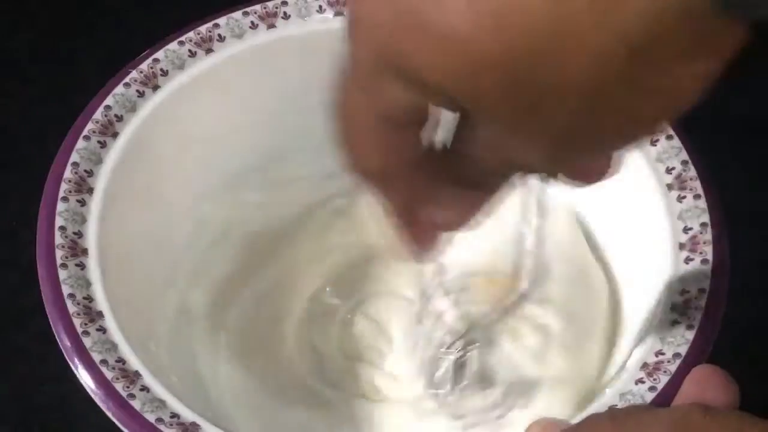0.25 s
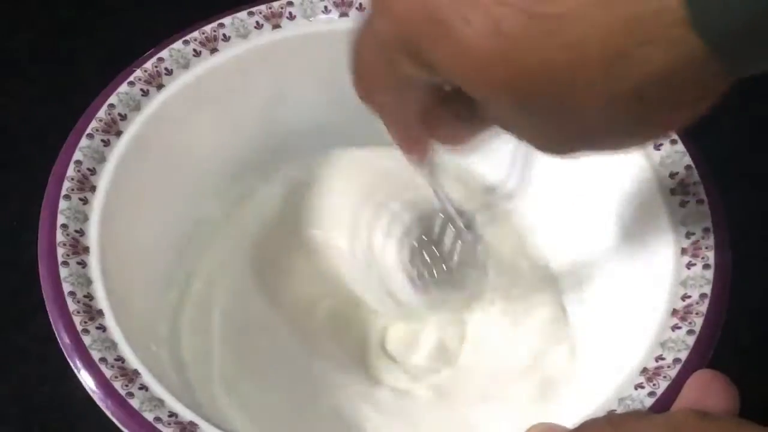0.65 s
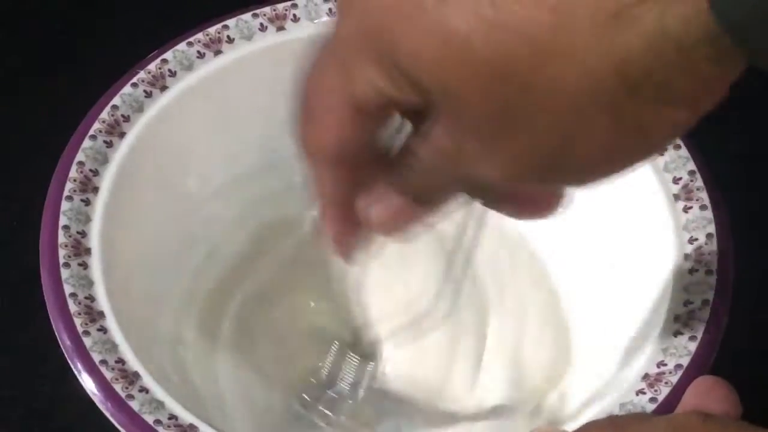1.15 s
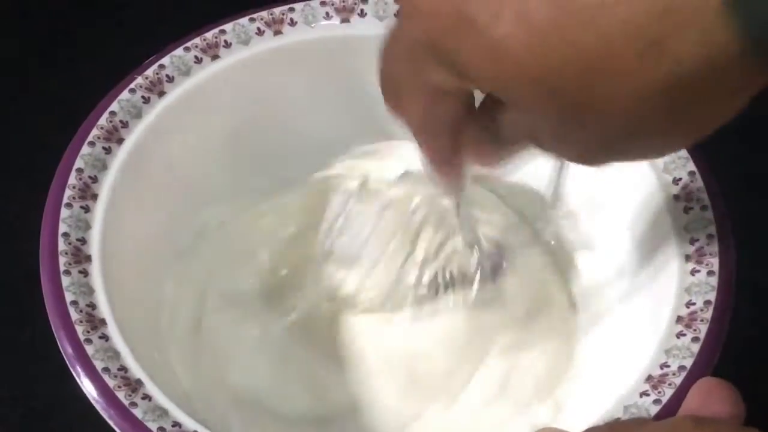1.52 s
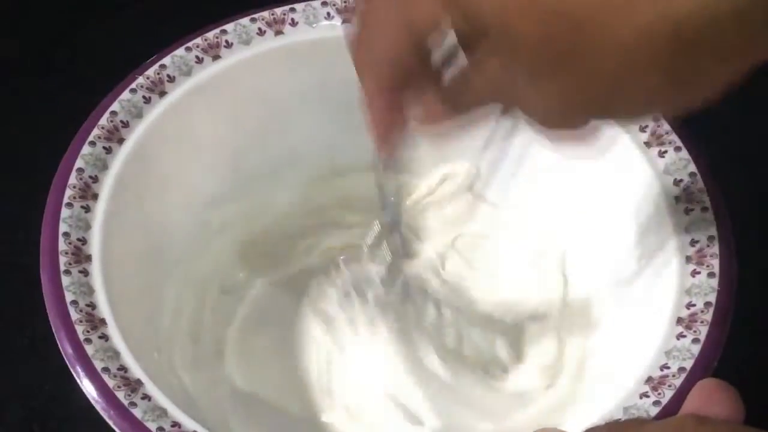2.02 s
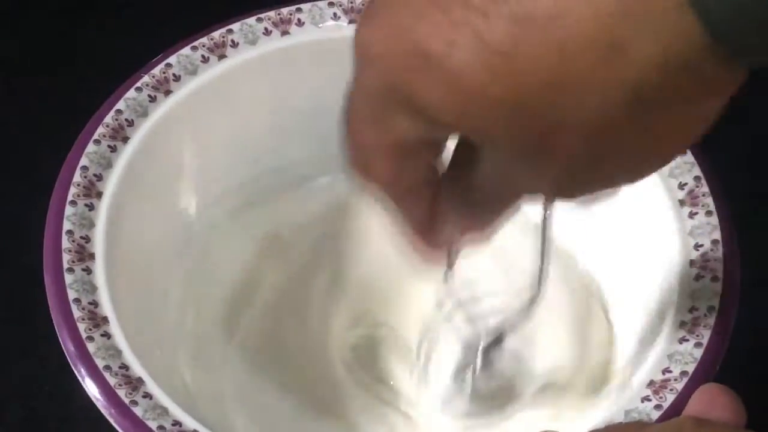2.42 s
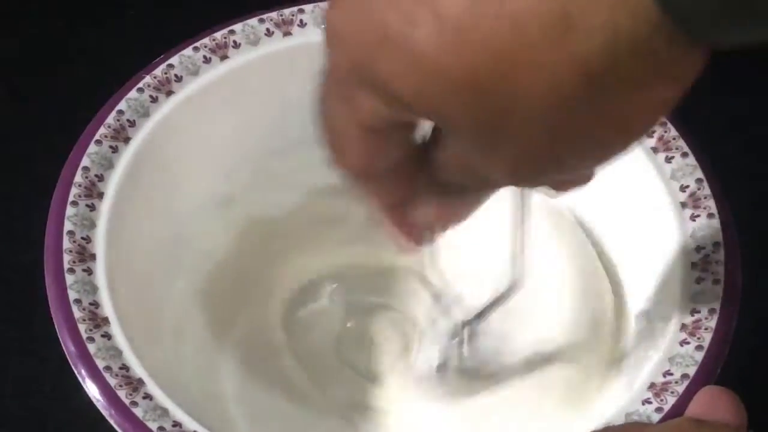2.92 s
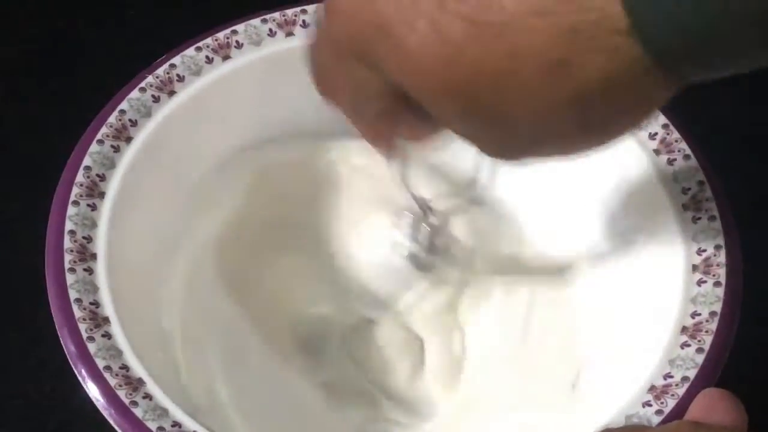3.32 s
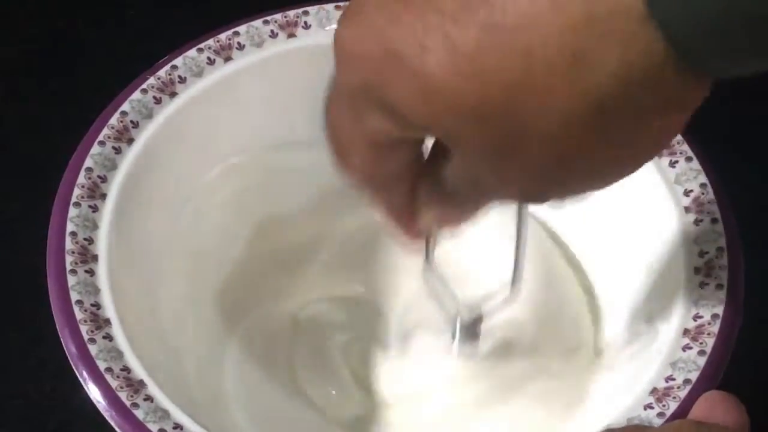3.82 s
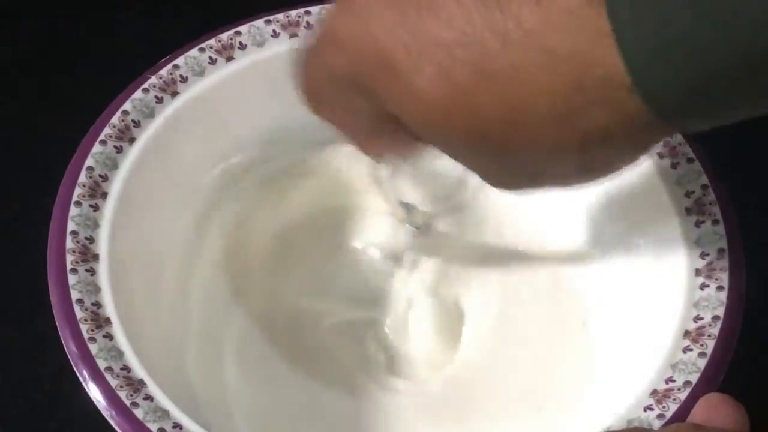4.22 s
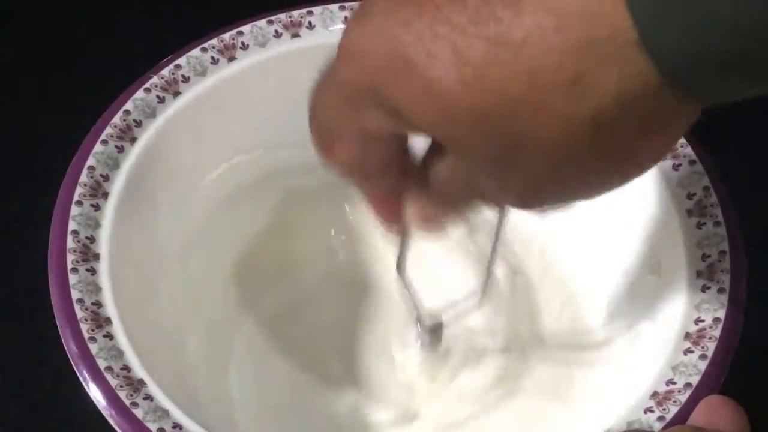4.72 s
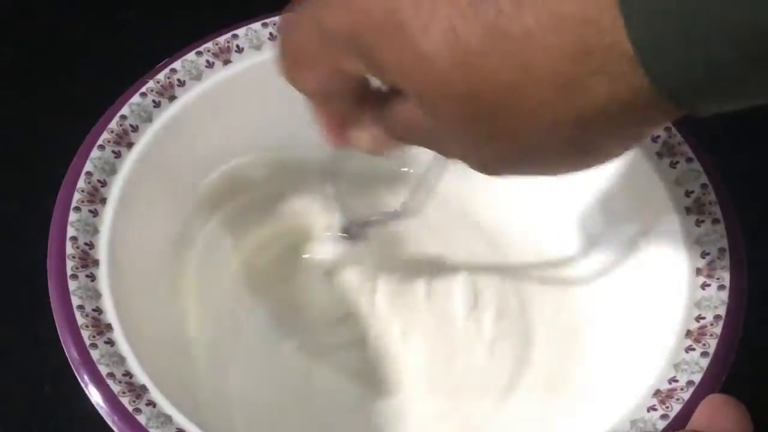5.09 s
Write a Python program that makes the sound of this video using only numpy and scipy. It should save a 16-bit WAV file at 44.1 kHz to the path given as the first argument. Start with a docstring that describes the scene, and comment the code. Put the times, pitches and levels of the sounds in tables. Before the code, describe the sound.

A wire whisk beats runny cream in a wide bowl, about four strokes a second. Each stroke is a wet, fizzy swish dotted with small squelches and sharp snaps of drops. About a second and a half in, the wires clatter against the bowl for three strokes with a brief ring, then the wet whisking carries on. The microphone is close, in a quiet room with a faint hum.

```python
"""A wire whisk beats runny cream in a wide bowl, about four strokes a second.
The place is a quiet room, with a phone microphone close to the bowl. Up front the wires tear the
cream into a fine crackle, air pockets squelch, and films and drops snap. For three strokes the wires
clatter against the bowl and ring. Behind it are faint wall reflections, a hum and a low rumble."""
import sys
import numpy as np
from scipy import signal
from scipy.fft import rfft, irfft, next_fast_len
from scipy.io import wavfile
from scipy.ndimage import map_coordinates

SR = 44100
rng = np.random.default_rng(int(sys.argv[2]) if len(sys.argv) > 2 else 0)


def generate_wav(signal):
    """Clip the signal to [-1, 1] and save it as 16-bit WAV at the path in sys.argv[1]."""
    frames = np.transpose(np.atleast_2d(signal))
    scaled = np.clip(frames, -1, 1) * 32767
    pcm = np.round(scaled).astype(np.int16)
    wavfile.write(sys.argv[1], SR, pcm)


N = 236050

# whisk strokes through the cream: t/s, length/s, relative fizz level/dB, body offset/dB
WHISK_STROKES = [(0.0, 0.17, -48, -6), (0.293, 0.2, -41.5, -10), (0.504, 0.093, -40.5, -5),
                 (0.634, 0.12, -44.5, -2.5), (0.774, 0.16, -44.5, -5.5), (1.044, 0.1, -37, -5.5),
                 (1.172, 0.16, -41.5, -8), (1.357, 0.071, -50, -13), (1.57, .11, -43, -1),
                 (1.761, .13, -41.5, -7), (1.977, 0.31, -43, -4), (2.262, 0.23, -45, -2),
                 (2.598, 0.25, -44.5, -5), (2.854, 0.27, -40.5, -11), (3.113, 0.19, -44, -1),
                 (3.331, .15, -42, 0), (3.522, 0.22, -44.5, 1), (3.747, 0.15, -45.5, -0.5),
                 (3.927, 0.088, -41.5, -3), (4.115, 0.24, -45.5, 0), (4.307, 0.069, -44, 2.5),
                 (4.465, .13, -46.5, 2.5), (4.732, 0.17, -47, 3), (4.963, 0.24, -46.5, -2.5),
                 (5.157, 0.18, -48, 4.5)]
# the loudest wet snaps of cream on the wires: t/s, relative crack level/dB, body offset/dB
CREAM_SNAPS = [(0.0093, -29.5, -8), (0.3209, -32, -10), (0.3706, -39, -14), (0.5016, -33, -16),
               (0.7326, -32.5, -19), (0.8306, -40.5, 9), (0.9571, -30.5, -10), (1.0345, -35.5, 1),
               (1.1367, -31, -12), (1.1864, -33, -5), (1.3126, -29, -22), (1.3664, -35, -16),
               (1.4431, -40, 8.5), (1.4685, -43.5, 2), (2.4598, -34.5, 0), (2.6999, -29, -8),
               (2.8069, -38, -13), (2.8803, -36.5, -7), (3.0338, -29.5, -22), (3.0698, -29, -14),
               (3.1655, -28.5, -3.5), (3.2551, -31, -6), (3.3852, -30, -16), (3.4798, -41, -11),
               (3.5441, -48, -8), (3.6192, -32, -13), (3.6944, -32.5, -4), (3.7542, -37, 10.5),
               (3.8551, -32.5, -9), (3.9327, -36, 0), (4.1166, -35.5, 6.5), (4.1297, -40, 0),
               (4.175, -33.5, 3), (4.3255, -32.5, -3), (4.3695, -40, -5), (4.4939, -31, 4.5),
               (4.7375, -43, 9.5), (4.9699, -30, -0.5), (5.0968, -47, 9), (5.1719, -28, -3)]
# air pockets behind the wires: t/s, length/s, starting f/Hz, relative levels of ring/dB and spray/dB
AIR_POCKETS = [(0.005, 0.014, 1607, -37.5, -48), (0.237, 0.052, 1860, -45.5, -45.5),
               (0.292, 0.039, 1078, -41, -40), (0.307, 0.04, 2230, -42, -47),
               (0.435, 0.034, 3450, -46.5, -43), (0.514, 0.038, 1110, -46.5, -55),
               (0.557, 0.018, 1150, -35, -38), (0.578, 0.02, 1266, -33.5, -49.5),
               (0.655, .035, 1210, -46, -36.5), (0.778, 0.09, 1244, -43, -49),
               (0.903, 0.03, 2643, -40.5, -36), (0.959, 0.023, 1174, -39, -44),
               (1.026, 0.05, 1353, -42, -46), (1.109, 0.013, 1870, -37.5, -56), (1.23, .03, 1370, -47, -52),
               (1.283, 0.058, 1943, -43, -41), (2.066, 0.032, 1373, -40.5, -44),
               (2.268, 0.03, 1726, -43, -39), (2.388, 0.026, 2580, -41, -43),
               (2.392, 0.0085, 3930, -29.5, -40), (2.636, 0.032, 3850, -41.5, -38.5),
               (2.698, 0.0095, 2510, -32, -46), (2.713, 0.023, 2170, -45, -41),
               (2.788, 0.045, 1290, -47, -55), (2.944, 0.052, 1183, -42.5, -52),
               (2.962, 0.021, 3480, -34, -48), (3.053, 0.033, 1346, -42, -49),
               (3.395, 0.029, 1402, -41.5, -59), (3.531, .025, 1643, -43, -56),
               (3.604, 0.031, 1310, -40.5, -40), (3.745, 0.019, 2586, -35.5, -59),
               (3.777, 0.024, 2110, -41, -59), (3.85, 0.03, 2720, -41.5, -35), (4.116, .02, 1132, -44, -40),
               (4.236, 0.043, 2980, -48, -44.5), (4.319, 0.014, 1043, -37.5, -34),
               (4.873, 0.0083, 3350, -41.5, -41.5), (5.22, .03, 1547, -45.5, -39),
               (5.309, 0.026, 3080, -44.5, -55)]
# wires striking the bowl: t/s, relative crack level/dB, body offset/dB
WIRE_KNOCKS = [(1.5178, -41.5, 5.5), (1.5699, -21.5, -0.5), (1.5789, -25.5, -20), (1.6281, -26, -11),
               (1.6585, -32, -2), (1.755, -34.5, 1), (1.7785, -23.5, 1.5), (1.8327, -38.5, 6),
               (1.848, -35.5, 4), (1.871, -30, -7), (1.9064, -37, 2.5), (1.9697, -32, -5),
               (1.9923, -20.5, -8), (2.0388, -45.5, 14), (2.0777, -35, -5), (2.101, -26.5, -5),
               (2.1985, -32, -6)]
# ringing modes of bowl and wires: f/Hz, relative level/dB, t60/s
RING_MODES = [(794, -5.5, 0.31), (1030, 7.5, 0.039), (1510, -3, 0.089), (2310, 0, 0.14), (2780, 3, 0.052),
              (4410, 0, 0.11), (6239, -2, 0.13), (6500, -6, 0.065), (6800, 13, 0.04), (7120, 4, 0.18),
              (8700, 4, 0.16), (11690, -1, 0.18), (13100, -7, .04), (13300, -1, .1), (15300, -2, .12)]
# air resonances of the open bowl: f/Hz, width/Hz, level over the direct sound/dB
BOWL_RESONANCES = [(718.6, 13, 8), (789, 32, -8), (927, 135, -7.5), (1249, 6.4, -4.5), (1571, 25, -7.5),
                   (2383, 38, -4), (2542, 90, -5), (2835, 150, -6.5), (3450, 71, -9), (4340, 117, -3),
                   (5270, 150, -13), (9850, 130, -16)]
# hum in the room: f/Hz, level before its balance shifts/dB, level after/dB
HUM_TONES = [(61, -87, -70), (101.6, -66.5, -71), (144.4, -73.5, -64.5), (291.5, -72, -71)]
# spectra: f/Hz, relative level/dB
FIZZ_SPECTRUM = [(300, -61), (700, -22), (1500, -4.5), (2800, -3), (4300, 1.5), (4900, -2), (5500, 3),
                 (7700, 0), (9600, 2.5), (10400, -2.5), (11700, 2.5), (15200, 1.5), (16000, -14)]  # bright top of the cream
BODY_SPECTRUM = [(150, -59), (500, -36.5), (630, -14), (820, 3), (1150, -0.5), (1450, -1), (2100, -1),
                 (3000, -3), (4200, -2.5), (8000, -4)]  # wet midrange of the cream
CRACK_SPECTRUM = [(250, -44), (1800, -21), (2700, -6), (5000, -6), (6500, 2), (7800, -6), (8700, -0.5),
                  (10300, -2.5), (13000, 5), (15800, -2)]  # sharp edge of a knock
THUD_SPECTRUM = [(150, -20), (480, -21.5), (620, -17), (780, 0), (1000, -7), (1500, -3), (2100, -4.5),
                 (3000, -14), (6000, -12.5)]  # dull body of a knock
RUMBLE_SPECTRUM = [(22, -19.5), (44, -1.5), (75, -4), (110, 0), (145, -1.5), (170, -9), (230, -10.5),
                   (330, -9.5), (520, -18), (1200, -12.5), (5000, -33), (16000, -52)]  # room tone


def whisk_strokes():
    """Fizz and body gains over time: strokes, spray from air pockets and settling foam add in power."""
    bite_s, sag_db, release_t60_s = 0.01, 4, 0.18
    foam_db, foam_body_db, spray_body_db = -52, 2, -8
    t = np.arange(N) / SR
    fizz = np.full(N, undb(foam_db) ** 2)
    body = np.full(N, undb(foam_db + foam_body_db) ** 2)
    for start, length, level_db, body_db in WHISK_STROKES:
        # a stroke bites quickly, loses speed as it ploughs on, and lets go
        age = np.maximum(t - start, 0)
        bite = np.minimum(age / bite_s, 1)
        sag = undb(-sag_db * np.minimum(age / length, 1))
        release = fade(np.maximum(age - length, 0), release_t60_s)
        power = (undb(level_db) * bite * sag * release) ** 2
        fizz += power
        body += power * undb(body_db) ** 2
    for start, length, _, _, spray_db in AIR_POCKETS:
        power = undb(spray_db) ** 2 * signal.windows.tukey(max(int(length * SR), 64), .5)
        add(fizz, start, power)
        add(body, start, power * undb(spray_body_db) ** 2)
    return np.sqrt(fizz), np.sqrt(body)


def swish(fizz_gain, body_gain, fizz_db, body_db, flutter_db, hollows_db):
    """Close to the microphone, wires tear the cream: bubbles fizz and shifting hollows colour them."""
    fine = bubbles(per_s=700, low_hz=2500, high_hz=15500, mean_t60=.016, spread_db=3)
    coarse = bubbles(per_s=600, low_hz=850, high_hz=4000, mean_t60=.026, spread_db=1.5)
    tearing = crackle(per_s=5000, spread_db=3.8, t60=.006)
    droplets = crackle(per_s=110, spread_db=2.5, t60=.01)
    sloshing = crackle(per_s=3500, spread_db=2, t60=.015)
    fizz = colour(unit(tearing + .6 * fine + .45 * droplets), FIZZ_SPECTRUM)
    body = colour(unit(sloshing + .6 * coarse), BODY_SPECTRUM)
    wet = undb(fizz_db) * fizz_gain * fizz + undb(body_db) * body_gain * body
    # half-octave bands swell and shrink on their own as the hollows change shape
    size = next_fast_len(N)
    hz = np.maximum(np.fft.rfftfreq(size, 1 / SR), 1)
    octave = np.log2(hz / 700).clip(0, 4)
    spectrum = rfft(wet, size)
    bands = (irfft(spectrum * np.maximum(1 - abs(2 * octave - k), 0), size)[:N] for k in range(9))
    shifting = sum(band * undb(hollows_db * wander(per_s=35)) for band in bands)
    return shifting * undb(flutter_db * wander(per_s=70))


def bubbles(per_s, low_hz, high_hz, mean_t60, spread_db, size=900):
    """Small bubbles burst, each ringing briefly at its own, slightly rising pitch; rms 1."""
    when, pitch, strength, lifespan = rng.random((int(per_s * N / SR), 4)).T[:, :, None]
    t = np.arange(size) / SR
    hz = low_hz + (high_hz - low_hz) * pitch
    t60 = mean_t60 * (.5 + lifespan)
    glide = 1 + .015 * np.minimum(t / t60, 1)
    gain = undb(spread_db * np.minimum(-np.log(strength), 3.5))
    pops = gain * (fade(t, t60) - fade(t, t60 / 10)) * np.sin(2 * np.pi * hz * t * glide)
    at = (when * N).astype(int) + np.arange(size)
    return unit(np.bincount(at.ravel(), pops.ravel(), N)[:N])


def crackle(per_s, spread_db, t60, places=5):
    """Countless tiny bursts of uneven size from several places in the bowl; rms 1."""
    out = np.zeros(N)
    for _ in range(places):
        happens = rng.random(N) < per_s / places / SR
        strength = undb(spread_db * np.minimum(rng.exponential(size=N), 3.5))
        burst = click(t60, tail_db=-24, tail_t60=.03)
        out += through(happens * strength * np.sign(rng.standard_normal(N)), burst)
    return unit(out)


def snaps(fizz_gain, crack_db, body_db):
    """Films of cream break and drops slap the side of the bowl."""
    events = CREAM_SNAPS + flung_drops(fizz_gain)
    crack, body = click_layers(events, t60=.012, body_t60=.018, tail_db=-20, tail_t60=.04, rise_s=.0004)
    return undb(crack_db) * colour(crack, FIZZ_SPECTRUM) + undb(body_db) * colour(body, BODY_SPECTRUM)


def flung_drops(fizz_gain, per_s=30, offset_db=3.5, spread_db=3, body_db=-2.5):
    """Rows of small snaps at chance moments, as strong as the stroke that flings them."""
    when, strength = rng.random((int(per_s * N / SR), 2)).T
    at = (when * N).astype(int)
    level_db = 20 * np.log10(fizz_gain[at]) + offset_db + spread_db * (2 * strength - 1)
    return [(i / SR, db, body_db) for i, db in zip(at, level_db)]


def squelches(gain_db, taper, climb_octaves_per_s=4.5):
    """Tearing cream rings each air pocket; it shrinks as cream flows back, so its pitch climbs."""
    out = np.zeros(N)
    for start, length, hz, level_db, _ in AIR_POCKETS:
        size = max(int(length * SR), 64)
        tearing = rng.standard_normal(size) + 1j * rng.standard_normal(size)
        width_hz = 16 * (hz / 1000) ** 2.3  # small, high pockets are damped more
        pole = np.exp(-np.pi * width_hz / SR)
        climbing_hz = hz * 2 ** (climb_octaves_per_s * np.arange(size) / SR)
        phase = 2 * np.pi * np.cumsum(climbing_hz) / SR
        tone = (signal.lfilter([1], [1, -pole], tearing) * np.exp(1j * phase)).real
        band = signal.butter(2, [hz / np.sqrt(2), hz * 2], "bandpass", fs=SR, output="sos")
        squelch = signal.sosfilt(band, tone) * signal.windows.tukey(size, taper)
        add(out, start, undb(level_db + gain_db) * unit(squelch))
    return out


def knocks(crack_db, body_db, ring_db, rebound_s=0.0031, full_rebound_db=-20):
    """Wires hit the bowl and bounce; each blow weights the cream-damped modes differently."""
    # the harder the blow, the nearer its rebound comes to full strength
    rebounds = [(start + rebound_s, db + min(db - full_rebound_db, 0), body_offset)
                for start, db, body_offset in WIRE_KNOCKS]
    blows = WIRE_KNOCKS + rebounds
    crack, body = click_layers(blows, t60=.008, body_t60=.017, tail_db=-20, tail_t60=.042, rise_s=.0001)
    t = np.arange(SR // 2) / SR
    modes = np.array([undb(db) * np.sin(2 * np.pi * hz * t) * fade(t, t60) for hz, db, t60 in RING_MODES])
    ring = np.zeros(N)
    for start, level_db, _ in blows:
        weights = undb(level_db + 2 * rng.standard_normal(len(modes))) * rng.choice([-1, 1], len(modes))
        add(ring, start, weights @ modes)
    impact = undb(crack_db) * colour(crack, CRACK_SPECTRUM) + undb(body_db) * colour(body, THUD_SPECTRUM)
    return impact + undb(ring_db) * ring


def click_layers(events, t60, body_t60, tail_db, tail_t60, rise_s):
    """The sharp crack and the slower body of every snap or knock in a list."""
    crack, body = np.zeros(N), np.zeros(N)
    for when, level_db, body_db in events:
        start = when - rise_s / 2
        add(crack, start, undb(level_db) * click(t60, tail_db, tail_t60, rise_s))
        add(body, start, undb(level_db + body_db) * click(body_t60, tail_db, tail_t60, rise_s))
    return crack, body


def click(t60, tail_db, tail_t60, rise_s=.0001, size=4096):
    """A click scatters inside the bowl, with a weaker, longer tail; energy 1."""
    t = np.arange(1, size + 1) / SR
    attack = 1 - np.exp(-(t / rise_s) ** 2)
    decay = fade(t, t60) + undb(tail_db) * fade(t, tail_t60)
    response = rng.standard_normal(size) * attack * decay
    return response / np.linalg.norm(response)


def bowl_echoes(x, level_db, sway, delays_s=(.0007, .0016)):
    """The near and far sides of the bowl reflect the sound; both paths change as the whisk circles."""
    lags = [delay * SR * (1 + sway * wander(per_s=8)) for delay in delays_s]
    return x + undb(level_db) * sum(map_coordinates(x, [np.arange(N) - lag], order=3) for lag in lags)


def bowl_hollow(x, size=4096):
    """The hollow of the bowl colours everything that sounds inside it."""
    t = np.arange(size) / SR
    response = np.zeros(size)
    for hz, width_hz, db in BOWL_RESONANCES:
        envelope = 2 * np.pi * width_hz / SR * np.exp(-np.pi * width_hz * t)
        response += undb(db) * envelope * np.cos(2 * np.pi * hz * t)
    return x + through(x, response)


def room(x, level_db, t60, cutoff_hz, size=22050):
    """Faint wall reflections reach the microphone after the direct sound, with less treble."""
    t = np.arange(size) / SR
    response = rng.standard_normal(size) * fade(t, t60) * (1 - fade(t, 0.018))
    late = through(x, response / np.linalg.norm(response))
    lowpass = signal.butter(1, cutoff_hz, fs=SR, output="sos")
    return x + undb(level_db) * signal.sosfilt(lowpass, late)


def room_tone(rumble_db, waver_rad, shift_s):
    """Under the whisk lie a low rumble and a wavering hum whose balance shifts once."""
    t = np.arange(N) / SR
    shifted = (1 + np.tanh(10 * (t - shift_s))) / 2
    hum = np.zeros(N)
    for hz, before_db, after_db in HUM_TONES:
        tone = unit(np.sin(2 * np.pi * hz * t + waver_rad * wander(per_s=12)))
        hum += tone * undb(before_db + (after_db - before_db) * shifted)
    return hum + undb(rumble_db) * colour(rng.standard_normal(N), RUMBLE_SPECTRUM)


def colour(x, points, size=8192):
    """Causal filter through (f/Hz, level/dB) points that keeps the power of white noise."""
    hz, db = np.transpose(points)
    bins_hz = np.maximum(np.fft.rfftfreq(size, 1 / SR), 1)
    gain = undb(np.interp(np.log(bins_hz), np.log(hz), db))
    cepstrum = irfft(np.log(gain))
    cepstrum[1:size // 2] *= 2  # fold onto positive time for minimum phase
    cepstrum[size // 2 + 1:] = 0
    response = irfft(np.exp(rfft(cepstrum)))
    return through(x, response / np.linalg.norm(response))


def wander(per_s):
    """Smooth random curve with a spread near 1, passing about per_s chance values a second."""
    at = np.arange(N) / SR * per_s + 2 + rng.random()
    return map_coordinates(rng.standard_normal(int(at[-1]) + 4), [at], order=2, mode="nearest")


def fade(t, t60):
    """Exponential decay, 60 dB down at t60."""
    return np.exp(-np.log(1000) * t / t60)


def undb(db):
    """Decibels to gain."""
    return 10 ** (np.asarray(db) / 20)


def unit(x):
    """Scale to rms 1."""
    return x / np.sqrt(np.mean(x ** 2) + 1e-20)


def add(out, start_s, x):
    """Mix x into out from start_s."""
    i = max(int(start_s * SR), 0)
    part = out[i:i + len(x)]
    part += x[:len(part)]


def through(x, response):
    """Pass a sound through an impulse response."""
    return signal.fftconvolve(x, response)[:len(x)]


def scene():
    """Whisk, cream and bowl at close range in a quiet room, on one microphone."""
    fizz_gain, body_gain = whisk_strokes()
    cream = swish(fizz_gain, body_gain, fizz_db=-5.0, body_db=-6, flutter_db=2.5, hollows_db=2.23)
    cream += snaps(fizz_gain, crack_db=18.0, body_db=16.0)
    cream = bowl_echoes(cream, level_db=-12.5, sway=0.147)
    cream += squelches(gain_db=-6.5, taper=0.2)
    clatter = knocks(crack_db=22.0, body_db=17.0, ring_db=-28)
    at_microphone = room(bowl_hollow(cream + clatter), level_db=-9.5, t60=0.93, cutoff_hz=7000)
    return (at_microphone + room_tone(rumble_db=-56.5, waver_rad=0.23, shift_s=4))[None]


def record(dry):
    """The phone beside the bowl cuts the treble above 16 kHz."""
    return signal.sosfilt(signal.ellip(10, .2, 80, 16000, fs=SR, output="sos"), dry)


dry = scene()
out = record(dry)
generate_wav(out)
```